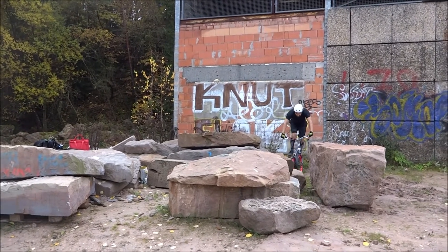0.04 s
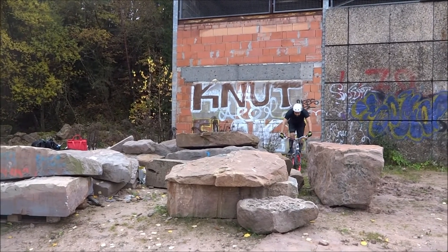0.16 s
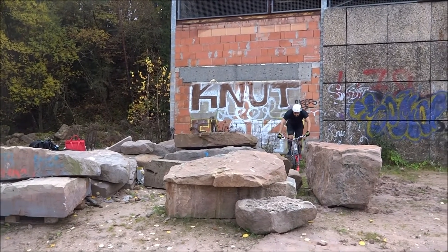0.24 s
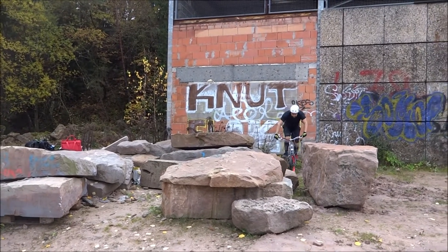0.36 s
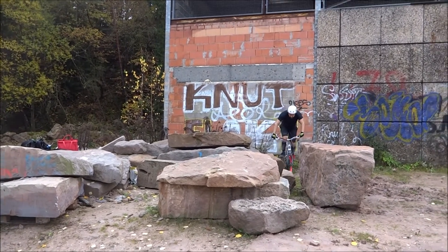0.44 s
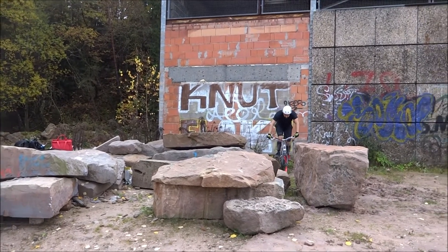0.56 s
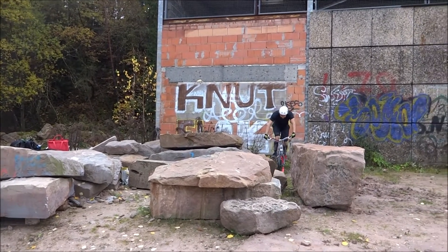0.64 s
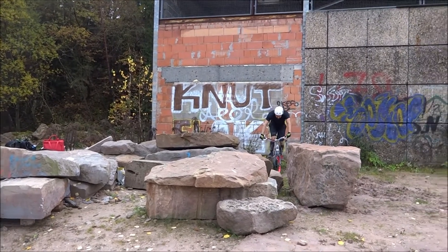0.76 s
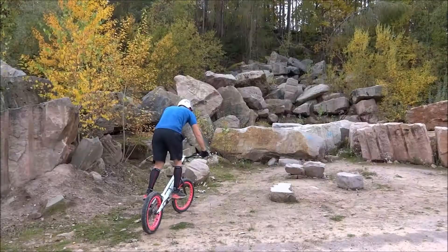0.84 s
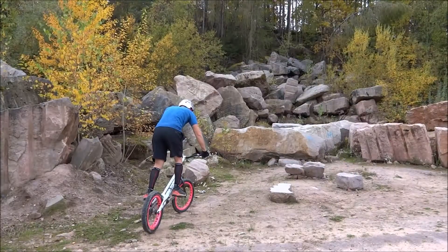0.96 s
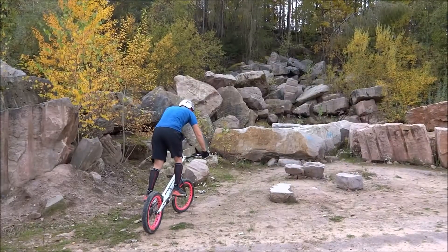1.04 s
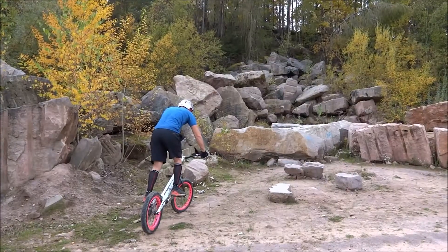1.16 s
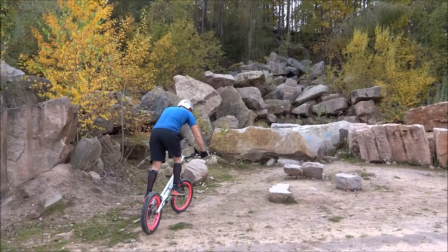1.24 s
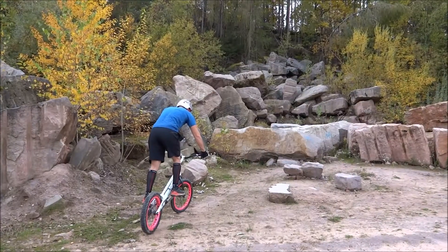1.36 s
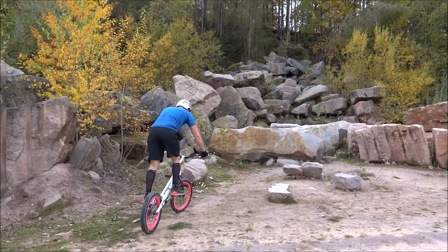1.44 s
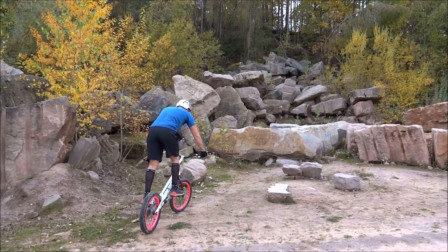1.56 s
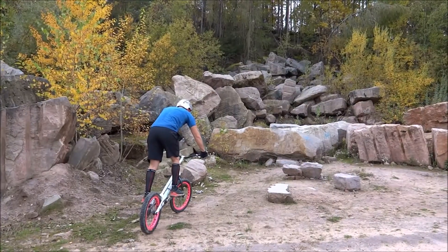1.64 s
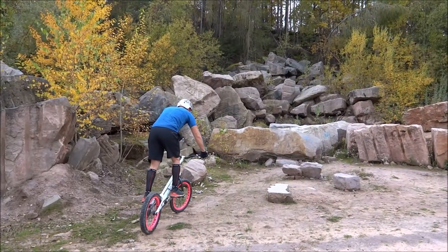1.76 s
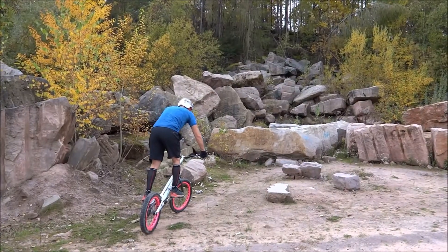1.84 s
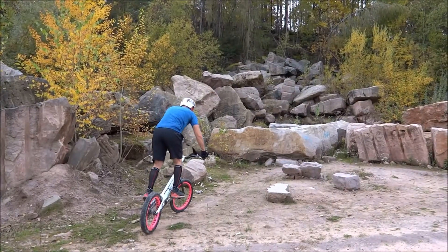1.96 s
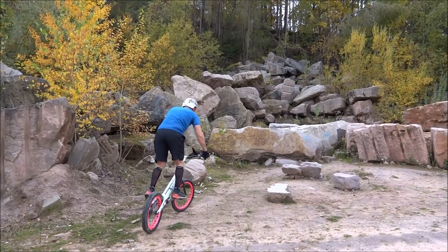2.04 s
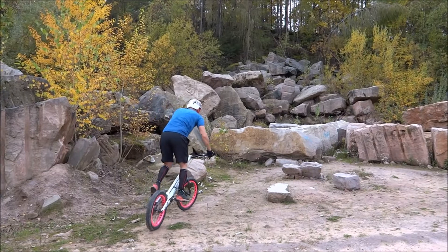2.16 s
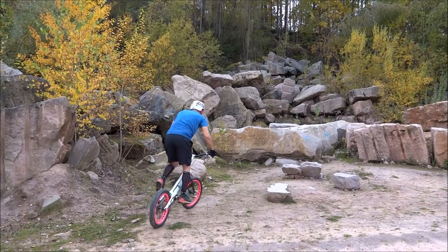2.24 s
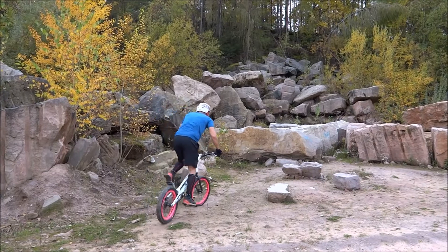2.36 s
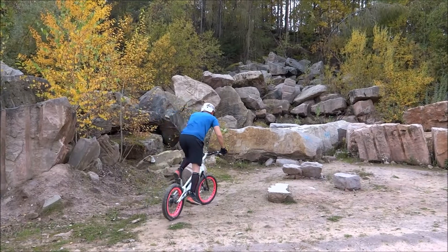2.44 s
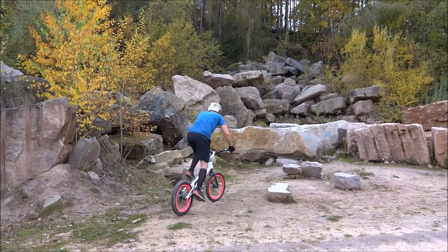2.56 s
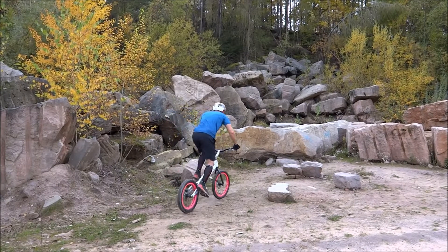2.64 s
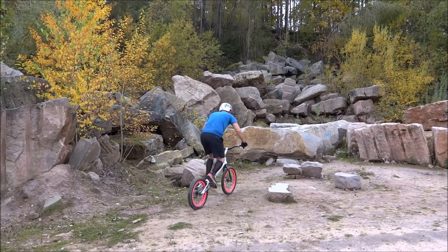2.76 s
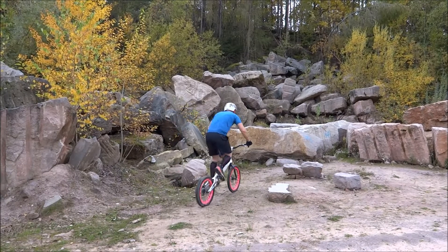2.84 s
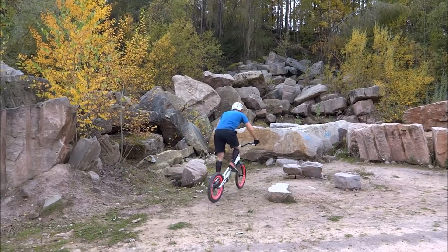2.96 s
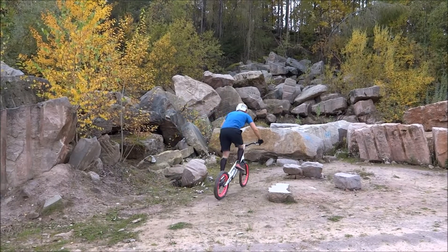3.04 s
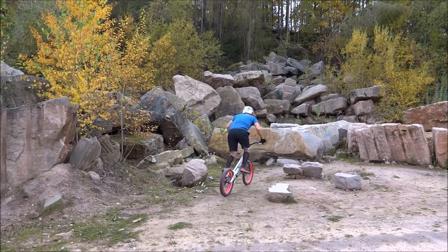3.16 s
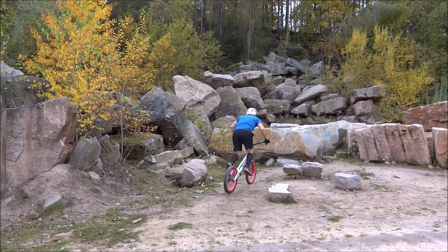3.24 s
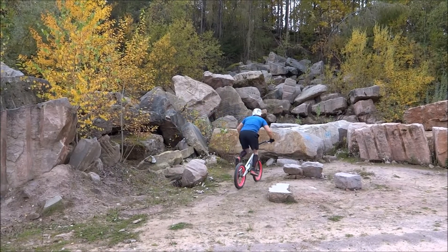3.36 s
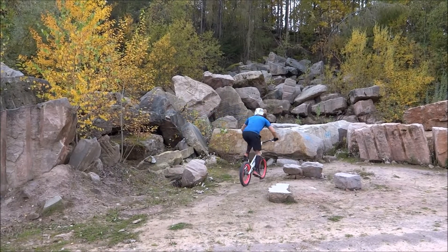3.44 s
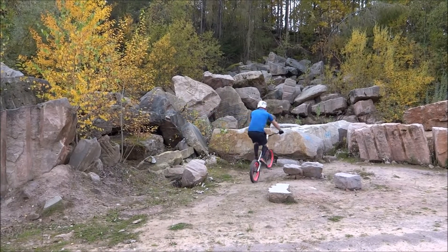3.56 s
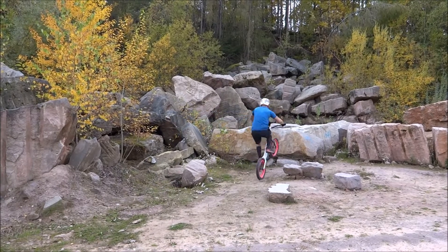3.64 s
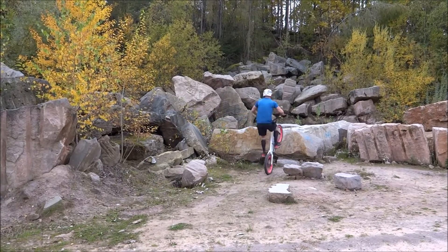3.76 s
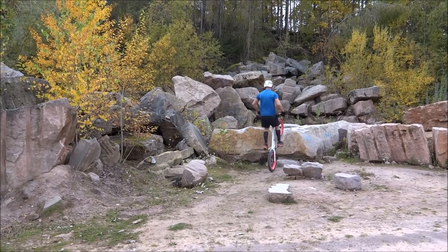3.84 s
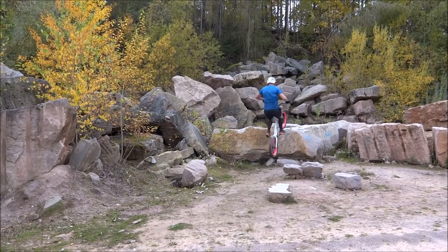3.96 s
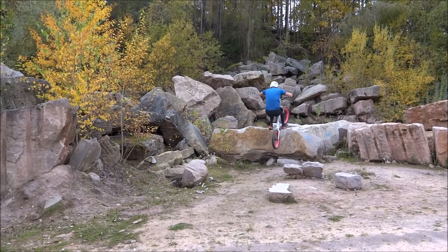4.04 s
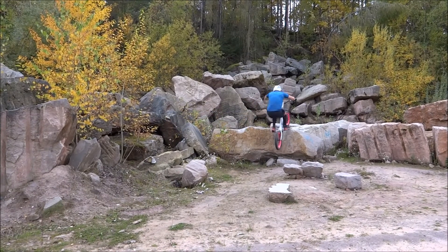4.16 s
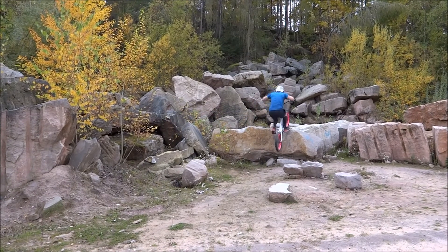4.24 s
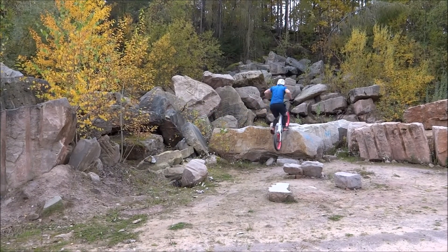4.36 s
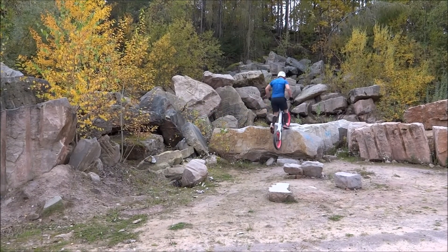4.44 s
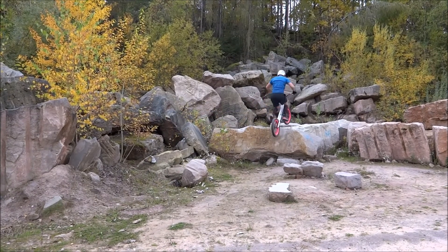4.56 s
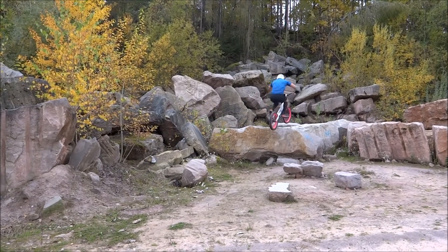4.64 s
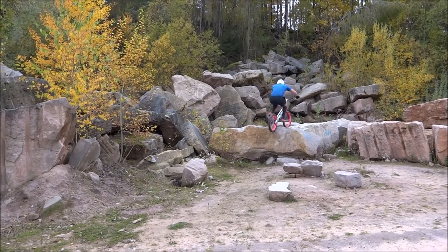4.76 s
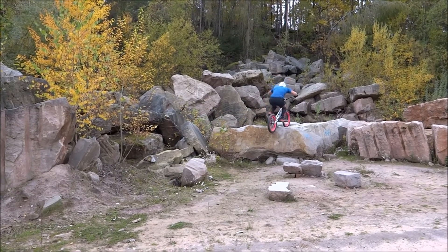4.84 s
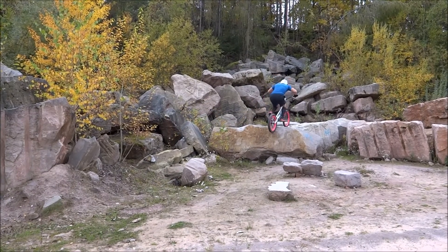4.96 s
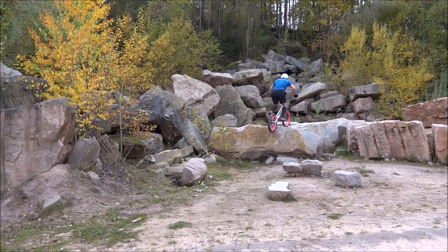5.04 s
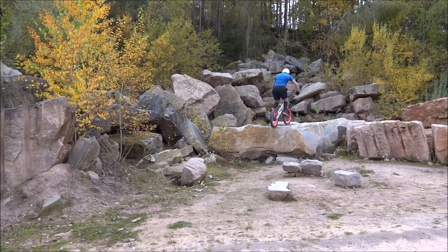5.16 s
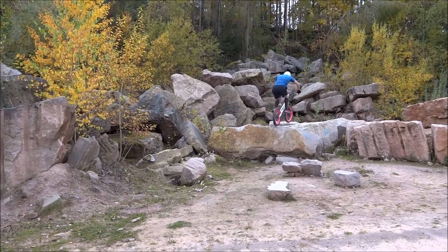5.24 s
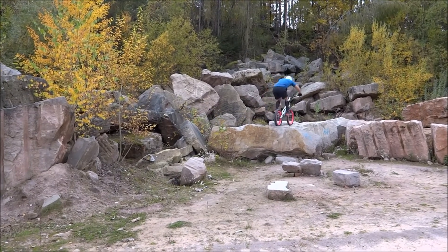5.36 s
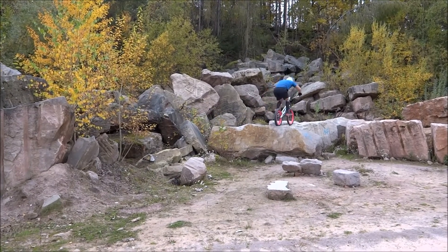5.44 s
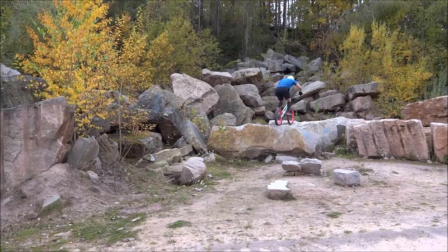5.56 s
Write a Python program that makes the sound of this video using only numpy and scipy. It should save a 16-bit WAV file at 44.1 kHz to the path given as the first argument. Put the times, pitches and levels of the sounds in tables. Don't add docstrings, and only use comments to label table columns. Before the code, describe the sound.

A bike freewheel snaps in bright bursts, tyres crunch over gravel, then a hard clanking landing on stone in an open quarry.

```python
import sys
import numpy as np
from scipy import signal
from scipy.io import wavfile

SR = 44100
rng = np.random.default_rng(int(sys.argv[2]) if len(sys.argv) > 2 else 0)


def boost_factor(decibels):
    exponent = np.asarray(decibels, float) / 20
    return 10 ** exponent


def digitize_waveform(pressure):
    field = np.atleast_2d(pressure).T
    bounded = np.clip(field, -1, 1)
    quanta = np.round(bounded * 32767).astype(np.int16)
    wavfile.write(sys.argv[1], SR, quanta)


N = 247401

# (frequency [Hz], density [dB per Hz])
HUM_SPECTRUM = [(12, -27), (20, 1), (74, -4), (138, -16), (163, -22.5), (367, -16.5), (849, -17.5),
                (2020, -17.5), (2460, -27), (4060, -28.5), (16000, -44)]
HUM_DB = -45
# (time [s], level [dB])
HUM_SWELL = [(0.1, -53), (0.67, -53.5), (1.4, -57.5), (2.03, -58), (2.5, -54.5), (3.4, -53), (3.7, -61),
             (4.14, -50.5), (4.55, -57.5), (4.93, -52.5), (5.61, -54.5)]
# (frequency [Hz], extra level [dB])
BUILDING_HUM = [(60, 0), (130, 8), (400, 1.5), (900, -0.5), (2000, -3.5)]
BUILDING_UNTIL_S = 0.848
# (frequency [Hz], likeness [0 to 1])
HUM_LIKENESS = [(30, 0.96), (60, 1), (125, 0.91), (300, 0.13), (600, 0.11), (1500, 0.13), (6000, 0.13),
                (14000, 0.87)]

# (time [s], crunch [dB], tread speed [-1 pushing to 1 rolling], weight on the carcass [dB])
ROLLING = [(0.0, -54, 0.081, -44), (.84, -63.5, 0.14, -45), (.86, -54, .3, -61), (1.08, -44.5, 0, -54),
           (1.3, -56.5, 0.16, -71), (1.9, -62.5, -0.66, -63), (2.09, -45.5, -0.85, -66),
           (2.3, -35.5, -0.47, -58), (2.55, -39.5, 0.33, -47), (2.84, -29, 0, -41.5), (3.0, -37, 0.21, -49),
           (3.62, -32, 0.43, -34), (3.85, -32, 0.12, -35.5), (3.89, -46, -0.38, -43),
           (4.45, -41.5, 0.11, -40), (4.62, -62, 0.49, -61), (4.85, -46, -0.34, -40.5),
           (5.61, -51.5, -.3, -52)]
# (frequency [Hz], level [dB])
GRAVEL_COLOUR = [(500, -25), (800, 7), (1500, 2), (2200, 7), (2900, 4.5), (3800, 1.5), (5400, 2),
                 (7000, -2), (10000, -2), (15500, -16)]
COARSE_PER_SPEED_DB, FINE_PER_SPEED_DB, FINE_DB = -6.5, 2, -8
# (frequency [Hz], width [Hz], level [dB])
CARCASS_MODES = [(78, 54, -4), (131, 9.8, -6), (182, 123, -1.5), (278, 30, -2.5), (398, 310, -5.5),
                 (606, 280, 1)]

# (time [s], peak level [dB])
CLOSE_TICKS = [(0.073, -28), (0.098, -24), (0.1253, -15), (0.1354, -21.5), (0.9609, -13), (0.964, -9.5),
               (0.9935, -13), (1.002, -8.5), (1.1507, -11.5), (1.159, -13), (1.165, -12), (1.251, -17),
               (1.2567, -12.5), (1.2768, -11), (1.412, -34), (1.419, -16), (1.446, -30), (1.4955, -34),
               (1.804, -35), (1.881, -32)]
# (time [s], peak level [dB])
FAR_TICKS = [(3.3125, -5.5), (3.338, -6), (3.3553, -6), (3.372, -6), (3.3928, -9), (3.7682, -7.5),
             (3.7825, -8.5), (4.3635, -19.5), (4.5366, -32), (5.026, -18), (5.18, -8), (5.1958, -12),
             (5.213, -9), (5.23, -13), (5.245, -9.5), (5.2605, -15), (5.282, -11), (5.341, -9.5),
             (5.3593, -14), (5.4015, -23)]
TICK_T60_S = 0.022
SPIN_START_S, SPIN_DROPS, SPIN_FASTEST_DROP = 3.912, 18, 7.2
SPIN_GAP_S, SPIN_SLOWING_S = 0.00685, 0.0000595
SPIN_DB, SPIN_T60_S = -8.5, 0.017
# (frequency [Hz], width [Hz], level [dB])
PAWL_MODES = [(1500, 1200, -8.5), (2010, 390, -16), (3070, 1400, -11), (4550, 630, -2.5), (5400, 980, -1),
              (6660, 410, -5.5), (7320, 440, -3), (8060, 590, -5.5), (9500, 940, -2.5), (11600, 1400, -5.5),
              (11000, 910, -2.5), (13270, 410, -4.5), (15100, 290, -11)]

# (time [s], peak level [dB])
TYRE_THUMPS = [(0.286, -29.5), (0.831, -42), (2.824, -38), (2.908, -25.5), (3.442, -32.5), (3.489, -34),
               (3.621, -29), (3.701, -26.5), (3.75, -27.5), (3.793, -37), (4.148, -14.5), (4.208, -18),
               (4.26, -27.5), (4.329, -40), (4.767, -20), (4.793, -31.5), (5.32, -33.5), (5.401, -34.5)]
THUMP_RISE_S, THUMP_T60_S = 0.003, 0.17

# (time of peak [s], peak level [dB], ring [Hz], decay t60 [s])
TUBE_KNOCKS = [(1.936, -27, 1500, 0.022), (1.937, -43, 2550, 0.026), (2.019, -43, 2000, .026),
               (2.381, -29, 2830, 0.036), (2.911, -18, 809, .044), (3.083, -24.5, 2750, 0.034),
               (3.699, -22, 3620, .06), (3.909, -22, 1200, 0.028), (4.093, -26, 3580, 0.028),
               (4.1471, -10.5, 3290, 0.031), (4.159, -8, 1350, .013), (4.167, -10.5, 2007, 0.055),
               (4.193, -7.5, 1500, 0.028), (4.554, -30, 1280, 0.073), (4.7662, -12.5, 1200, 0.23),
               (4.779, -9.5, 3350, 0.025), (4.803, -10, 1000, 0.088), (5.164, -37, 1280, .04)]
KNOCK_RISE_S, KNOCK_CRACK_DB = 0.00087, -39
# (time of peak [s], peak level [dB], ring [Hz], build-up [s])
CHAIN_SLAPS = [(2.27, -32, 2900, .084), (2.84, -17.5, 836, .028), (2.904, -15.5, 2800, 0.0033),
               (3.228, -19.5, 2070, 0.033), (4.057, -22, 1350, 0.0046), (4.156, -3, 3320, 0.0027),
               (4.185, -3.5, 1350, 0.005), (4.19, -2.5, 3670, .0054), (4.215, -2.5, 1409, .01),
               (4.265, -5.5, 2007, 0.008), (4.418, -15, 3800, 0.017), (4.433, -17, 1370, .0035),
               (4.483, -23, 1350, 0.022), (4.492, -17, 1352, .0035), (4.803, -8, 3350, 0.0046),
               (5.054, -17, 1295, 0.017), (5.319, -11.5, 807, .014), (5.323, -9, 4940, 0.0073),
               (5.317, -24.5, 1870, 0.0043), (5.409, -26, 3630, 0.014)]
SLAP_T60_S, SLAP_T60_PER_RISE, SLAP_CRACK_DB = 0.015, 2.72, -8.5
# (time of peak [s], peak level [dB], ring [Hz])
CHAIN_DRAGS = [
    (.291, -35, 790),
    (0.854, -36, 2800),
    (4.242, -21, 1350),
    (4.389, -18.5, 2930),
    (4.839, -33, 4470),
    (5.335, -25.5, 2020),
]
DRAG_RISE_S, DRAG_T60_S, DRAG_CRACK_DB = 0.0035, 0.28, -2.5
# (frequency [Hz], width [Hz], level [dB])
FRAME_MODES = [(649, 47, -7), (910, 125, -2), (1350, 510, 2), (1920, 210, 0.5), (2800, 690, -5.5),
               (3350, 1200, 3.5), (3800, 1100, -0.5), (5030, 1300, 0.5)]

# start [s], end [s], start pitch [Hz], end pitch [Hz], level [dB]
KNOB_CREAK = (2.19, 2.3, 450, 420, -41)

QUARRY_T60_S, QUARRY_CUT_HZ, QUARRY_DB = 0.083, 22000, -17
SCATTER_S, SCATTER_DB = 0.008, -18.5
# (time [s], left minus right [dB])
BALANCE = [(0, -.2), (.84, -.2), (.86, 1.2), (2.2, 1.0), (3.5, 0), (5.61, -.2)]
# (frequency [Hz], width [Hz], level [dB])
COMB_DIPS = [(500, 110, -9), (1060, 200, -9), (1750, 250, -10), (2450, 220, -10), (3060, 200, -4),
             (3680, 220, -4), (4330, 250, -4), (5070, 220, -5), (5950, 300, -3), (6930, 350, -6),
             (7700, 350, -3)]
TOP_HZ = 16100


def at_hz(points, hz):
    table_hz, values = np.transpose(points)
    return np.interp(np.log(hz), np.log(table_hz), values)


def in_time(rows):
    s, *columns = np.transpose(rows)
    return [np.interp(np.arange(N) / SR, s, c) for c in columns]


def rms_one(x):
    return x / np.sqrt(np.mean(x ** 2) + 1e-20)


def drift(rate_hz):
    r = np.exp(-2 * np.pi * rate_hz * 40 / SR)
    noise = rng.standard_normal(N // 40 + 2002)
    slow = signal.lfilter([1], [1, -2 * r, r * r], noise)[2000:]
    return np.interp(np.arange(N) / 40, np.arange(len(slow)), rms_one(slow))


def butter(x, hz, kind, order=2):
    sos = signal.butter(order, np.clip(hz, 10, 0.47 * SR), kind, fs=SR, output="sos")
    return signal.sosfilt(sos, x)


def resonate(x, hz, width_hz):
    r = np.exp(-np.pi * width_hz / SR)
    gain = np.sqrt((1 - r * r) / 2)
    return signal.lfilter([gain, 0, -gain], [1, -2 * r * np.cos(2 * np.pi * hz / SR), r * r], x + 1e-18)


def grit(per_s, spread_db):
    sizes = boost_factor(spread_db * np.minimum(rng.exponential(1, N), 4)) * rng.choice([-1, 1], N)
    return rms_one(sizes * (rng.random(N) < per_s / SR))


def blows(times, rise_s, t60_s, levels_db):
    forces = np.zeros((levels_db.shape[1], N))
    for s, rise, t60, db in zip(times, rise_s, t60_s, levels_db):
        start = round((s - rise) * SR)
        t = np.arange(min(int((rise + t60) * SR), N - start)) / SR
        build_up = np.sin(np.pi / 2 * np.minimum(t / rise, 1)) ** 2
        fall = boost_factor(-60 * np.maximum(t - rise, 0) / t60)
        forces[:, start:][:, :len(t)] += boost_factor(db)[:, None] * build_up * fall
    return forces


def struck(forces, modes, contact):
    total = 0
    for k, (force, (hz, width_hz, _)) in enumerate(zip(forces, modes)):
        total = total + resonate(force * np.roll(contact, 15013 * k), hz, width_hz)
    return total


def hum():
    out = 0
    edges = 20 * 2 ** np.arange(0, 9.8, 0.5)
    swell = boost_factor(in_time(HUM_SWELL)[0] + 50)
    by_building = np.arange(N) < BUILDING_UNTIL_S * SR
    white = rng.standard_normal((2, 2, N))
    for k, (low, high) in enumerate(zip(edges, edges[1:])):
        mid, side = butter(white[k % 2], [low, high], "band")
        hz = np.sqrt(low * high)
        alike = np.clip(at_hz(HUM_LIKENESS, hz), 0, 1)
        gain = boost_factor(at_hz(HUM_SPECTRUM, hz) + 1.2 * drift(6))
        if k < 5:
            gain = gain * swell
        gain = gain * boost_factor(at_hz(BUILDING_HUM, hz) * by_building)
        out = out + gain * (np.sqrt(1 + alike) * mid + np.sqrt(1 - alike) * side * [[1], [-1]])
    return boost_factor(HUM_DB) * rms_one(out)


def gravel():
    level_db, speed, rumble_db = in_time(ROLLING)
    coarse_db = level_db + COARSE_PER_SPEED_DB * speed
    fine_db = level_db + FINE_DB + FINE_PER_SPEED_DB * speed
    clumps = drift(12)
    sizes = np.zeros((3, N))
    grains = [grit(5000, spread_db=4.5), grit(5000, spread_db=1.0)]
    for k, hz in enumerate(np.geomspace(520, 15000, num=22)):
        ring = resonate(np.roll(grains[k % 2], 11003 * k), hz, 0.2 * hz) * np.sqrt(hz)
        size = np.searchsorted([3300, 7000], hz)
        sizes[size] += ring * boost_factor(at_hz(GRAVEL_COLOUR, hz) + 1.2 * clumps + 1.8 * drift(8))
    crunch = sum(boost_factor(db - 1.5) * rms_one(x) for db, x in zip([coarse_db, level_db, fine_db], sizes))
    steady = np.ones((len(CARCASS_MODES), 1)) * boost_factor(np.array(CARCASS_MODES)[:, 2:])
    rumble = struck(steady, CARCASS_MODES, grit(900, spread_db=4.5))
    return crunch + boost_factor(rumble_db - 7) * rms_one(rumble)


def pawl_rows():
    gaps = SPIN_GAP_S + SPIN_SLOWING_S * (np.arange(SPIN_DROPS - 1) - SPIN_FASTEST_DROP) ** 2
    spin = SPIN_START_S + np.append(0, np.cumsum(gaps))
    rows = [(s, db, TICK_T60_S) for s, db in CLOSE_TICKS + FAR_TICKS]
    rows += [(s, SPIN_DB, SPIN_T60_S) for s in spin]
    return np.transpose(rows)


def freewheel():
    s, db, t60 = pawl_rows()
    colour_db = 2.5 * rng.standard_normal((len(s), len(PAWL_MODES)))
    levels = db[:, None] + np.array(PAWL_MODES)[:, 2] - 19.5 + colour_db
    rise = np.interp(s, [2, 3.3], [0.0004, 0.0022])
    forces = blows(s + rise, rise, t60, levels)
    forces += blows(s + 2 * rise, 2 * rise, 5 * t60, levels - 18)
    return butter(struck(forces, PAWL_MODES, grit(24000, spread_db=2)), 1100, "high")


def thumps():
    s, db = np.transpose(TYRE_THUMPS)
    colour_db = 1.7 * rng.standard_normal((len(s), len(CARCASS_MODES)))
    levels = db[:, None] + np.array(CARCASS_MODES)[:, 2] - 11.0 + colour_db
    forces = blows(s, np.full(len(s), THUMP_RISE_S), np.full(len(s), THUMP_T60_S), levels)
    return struck(forces, CARCASS_MODES, rng.standard_normal(N))


def clank_rows():
    rows = [(s, db, hz, KNOCK_CRACK_DB, KNOCK_RISE_S, t60) for s, db, hz, t60 in TUBE_KNOCKS]
    for s, db, hz, rise in CHAIN_SLAPS:
        rows.append((s, db, hz, SLAP_CRACK_DB, rise, SLAP_T60_S + SLAP_T60_PER_RISE * rise))
    rows += [(s, db, hz, DRAG_CRACK_DB, DRAG_RISE_S, DRAG_T60_S) for s, db, hz in CHAIN_DRAGS]
    return np.transpose(rows)


def clear_rings(times, rise_s, t60_s, levels_db, pitches_hz):
    out = np.zeros(N)
    unsteady_s = np.cumsum(1 + 0.025 * drift(150)) / SR
    for s, rise, t60, db, hz in zip(times, rise_s, t60_s, levels_db, pitches_hz):
        force = blows([s], [rise], [t60], np.array([[db]]))[0]
        sounding = force > 0
        out[sounding] += force[sounding] * np.sin(2 * np.pi * hz * unsteady_s[sounding])
    return out


def clanks():
    s, db, hz, crack_db, rise, t60 = clank_rows()
    modes = np.array(FRAME_MODES)
    octaves = np.abs(np.log2(modes[:, 0] / hz[:, None]))
    colour_db = 1.5 * rng.standard_normal(octaves.shape)
    levels = db[:, None] + modes[:, 2] - 13.5 - 5.5 * octaves + colour_db
    rise = np.clip(rise, 0.0003, 0.12)
    forces = blows(s, rise, t60, levels)
    forces += blows(s, rise, 4 * t60, levels - 25)
    contact = grit(9000, spread_db=3.5)
    crack = blows(s, rise, 1.06 * t60, (db + crack_db - 4.0)[:, None])[0] * contact
    crack = butter(butter(crack, 3300, "high"), 5000, "low", order=1)
    slow_db = 20 * np.log10(np.maximum(rise / 0.009, 1))
    ring_db = db - 5 - slow_db - np.maximum(crack_db + 10, -4)
    ring = clear_rings(s, rise, np.minimum(t60, 0.035), ring_db, hz)
    return struck(forces, FRAME_MODES, contact) + ring + crack


def creak():
    start, end, hz_start, hz_end, db = KNOB_CREAK
    part = np.clip((np.arange(N) / SR - start) / (end - start), 0, 1)
    hz = hz_start + (hz_end - hz_start) * part
    tone = np.sin(2 * np.pi * np.cumsum(hz) / SR)
    return boost_factor(db + 1.5 * drift(30)) * np.sin(np.pi * part) * tone


def quarry(x):
    t = np.arange(int(QUARRY_T60_S * SR)) / SR
    mid, side = rng.standard_normal((2, len(t))) * boost_factor(-60 * t / QUARRY_T60_S) * (t > 0.004)
    returns = np.array([mid + 0.5 * side, mid - 0.5 * side]) / np.sqrt(np.sum(mid ** 2))
    dulled = butter(x, QUARRY_CUT_HZ, "low", order=1)
    return boost_factor(QUARRY_DB) * signal.fftconvolve(dulled[None], returns)[:, :N]


def scatter(x):
    t = np.arange(int(SCATTER_S * SR)) / SR
    unlike = rng.standard_normal(len(t)) * boost_factor(-30 * t / SCATTER_S)
    side = signal.fftconvolve(x, unlike / np.sqrt(np.sum(unlike ** 2)))[:N]
    return boost_factor(SCATTER_DB) * butter(side, 180, "high", order=1) * [[1], [-1]]


def scene():
    bike = freewheel() + clanks() + thumps() + gravel() + creak()
    balance_db = in_time(BALANCE)[0]
    return (bike + quarry(bike) + scatter(bike) + hum()) * boost_factor([balance_db / 2, -balance_db / 2])


def dip(x, hz, width_hz, db):
    c = -2 * np.cos(2 * np.pi * hz / SR)
    a = np.tan(np.pi * width_hz / SR)
    g = np.sqrt(boost_factor(db))
    return signal.lfilter([1 + a * g, c, 1 - a * g], [1 + a / g, c, 1 - a / g], x)


def surface_comb(x):
    combed = x
    for hz, width_hz, db in COMB_DIPS:
        combed = dip(combed, hz, width_hz, db)
    share = np.where(np.arange(N) < BUILDING_UNTIL_S * SR, 0.6, 1)
    return share * combed + (1 - share) * x


def roll_off(x):
    return signal.sosfilt(signal.butter(12, 16800, fs=SR, output="sos"), x)


def record(dry):
    heard = butter(surface_comb(dry), TOP_HZ, "low", order=10)
    mix = 1.104 * np.tanh(1.294 * heard / 1.094)
    return roll_off(mix)


dry = scene()
out = record(dry)
digitize_waveform(out)
```